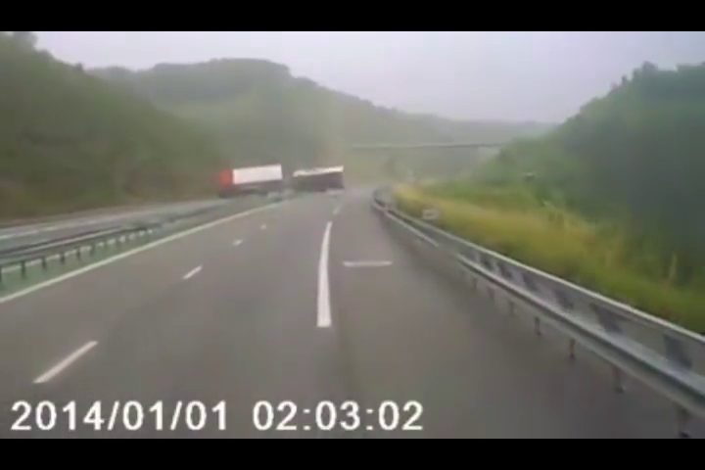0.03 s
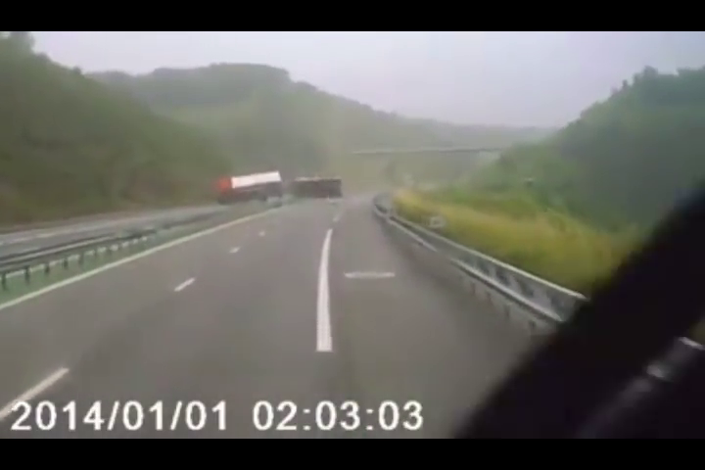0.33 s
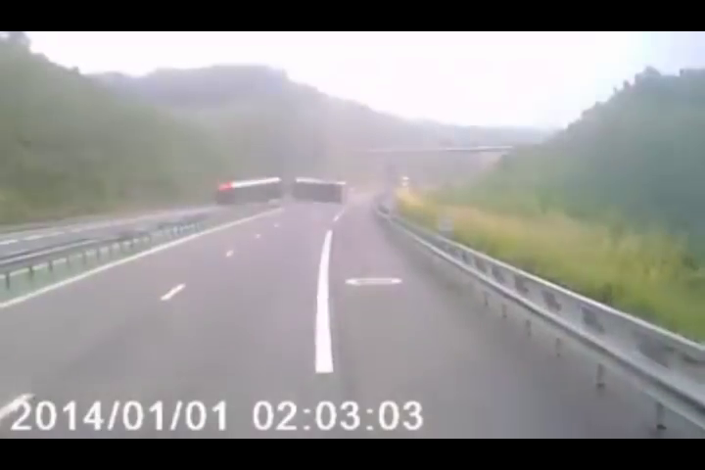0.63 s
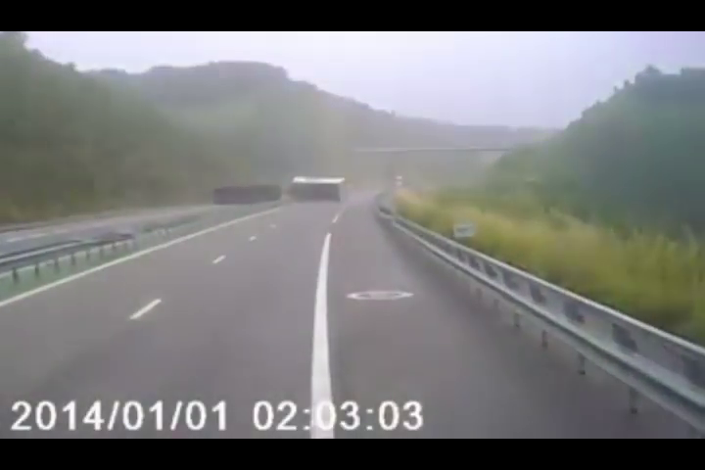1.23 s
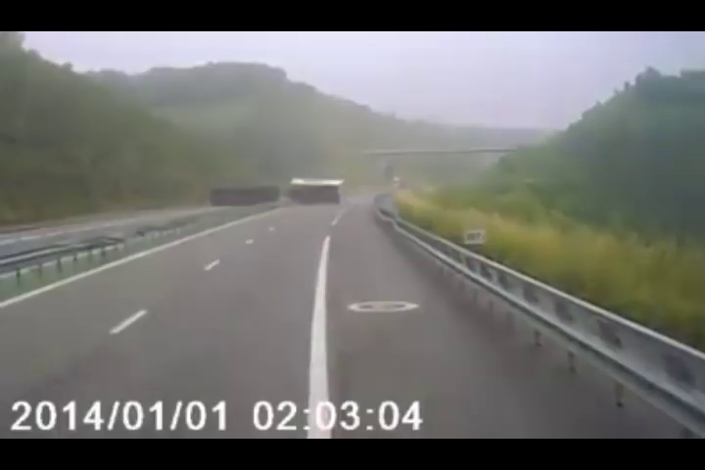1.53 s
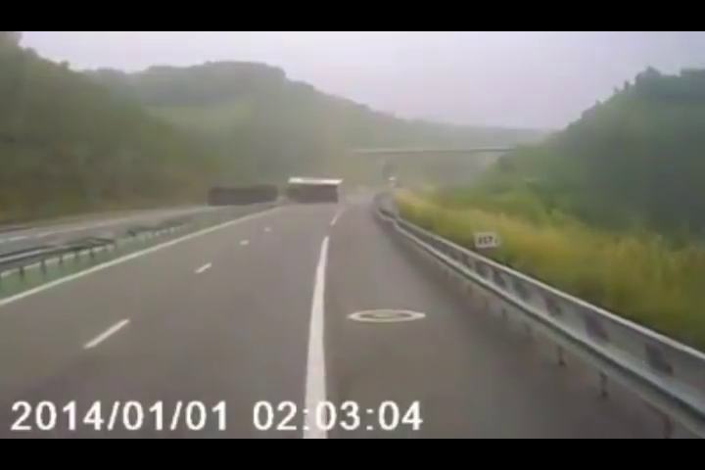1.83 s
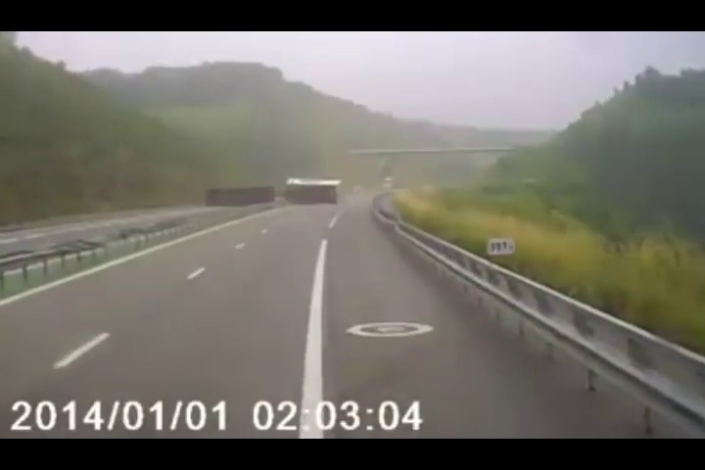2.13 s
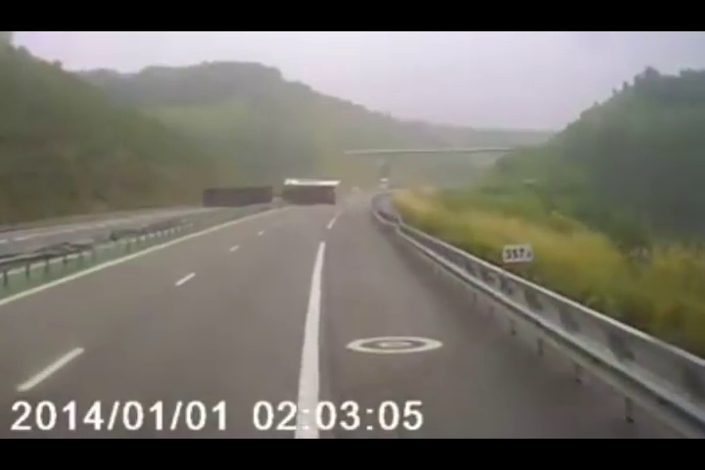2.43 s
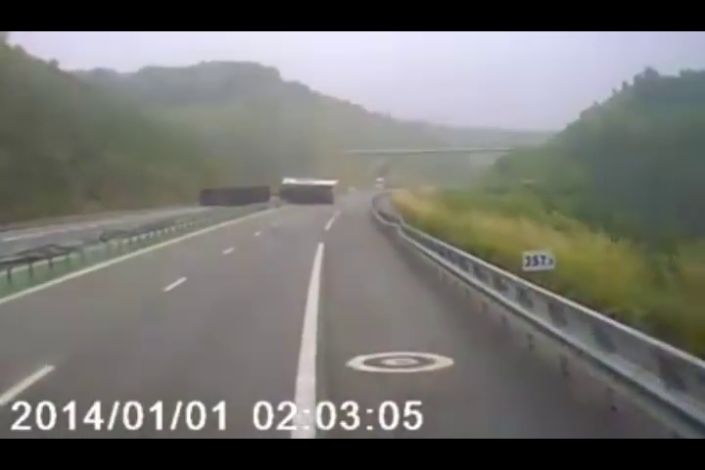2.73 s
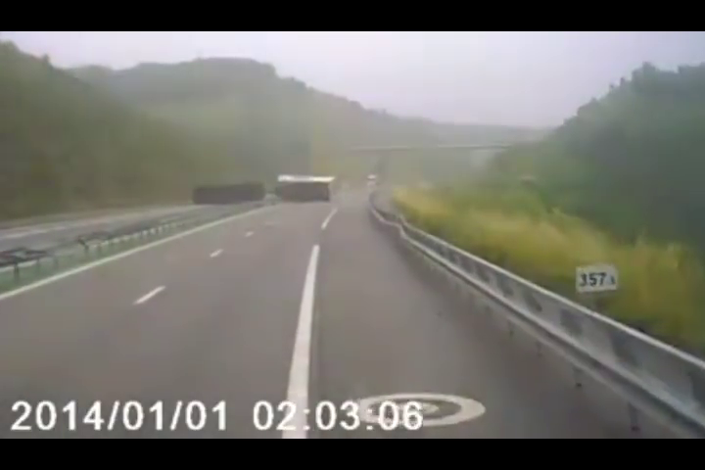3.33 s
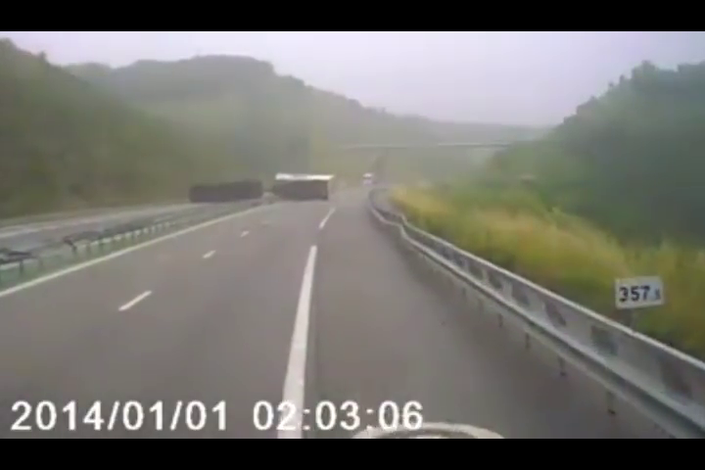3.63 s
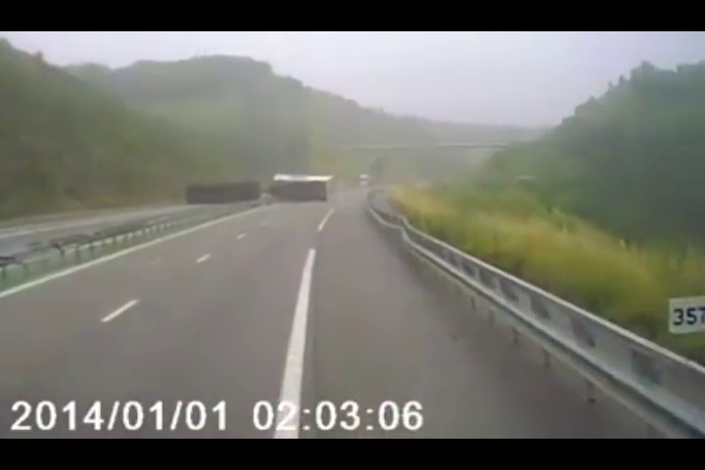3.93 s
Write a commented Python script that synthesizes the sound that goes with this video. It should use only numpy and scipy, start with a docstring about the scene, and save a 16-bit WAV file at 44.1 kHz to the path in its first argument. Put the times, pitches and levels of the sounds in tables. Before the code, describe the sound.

Road rumble and tyre roar fill the cabin of a vehicle on a highway. Two early bumps shake it, the first overloading the microphone. Loose trim knocks and rattles, and a turn indicator starts ticking about halfway through.

```python
"""Inside a vehicle on a highway. Tyre roar, body rumble and cabin drone swell on rough asphalt.
At once a bump shakes the cabin and overloads the microphone; a second follows at 1.2 s.
Loose trim knocks, bonks, snaps and squeaks along the way, and from 2 s it also rattles.
At 2.2 s the turn indicator starts ticking. A faint hum and microphone hiss last to the end."""
import sys
import numpy as np
from scipy import signal
from scipy.fft import rfft, irfft
from scipy.io import wavfile
from scipy.ndimage import uniform_filter1d

SR = 44100
rng = np.random.default_rng(int(sys.argv[2]) if len(sys.argv) > 2 else 0)


def log_audio(samples):
    """Write samples as a 16-bit WAV file to the path given in sys.argv[1]."""
    # one column per channel
    frames = np.atleast_2d(samples).T
    # limit to full scale, then quantise
    limited = np.clip(frames, -1, 1)
    pcm = np.round(limited * 32767).astype(np.int16)
    wavfile.write(sys.argv[1], SR, pcm)


N = 176400


def amp(db):
    """Amplitude ratio of a level."""
    return 10 ** (np.asarray(db) / 20)

def unit(x):
    """Normalisation to rms 1."""
    return x / np.sqrt(np.mean(x ** 2) + 1e-20)

def add(mix, onset, sound):
    """Superposition of a sound at onset/s."""
    part = mix[max(round(onset * SR), 0):][:len(sound)]
    part += sound[:len(part)]

def colour(x, spectrum):
    """Spectral shaping, to rms 1."""
    hz, db = np.transpose(spectrum)
    f = np.fft.rfftfreq(len(x), 1 / SR)
    gain = amp(np.interp(np.log(f + 1), np.log(hz), db))
    return unit(irfft(rfft(x) * gain, len(x)))

def drift(hz):
    """Low-pass random fluctuation, rms 1."""
    f = np.fft.rfftfreq(N, 1 / SR)
    return unit(irfft(rfft(rng.standard_normal(N)) * (f > 0) / (1 + (f / hz) ** 4), N))

def patchy_noise(depth_db=2):
    """Noise modulated at random in time and frequency."""
    z = signal.stft(rng.standard_normal(N), nperseg=1024, noverlap=768)[2]
    patches = uniform_filter1d(rng.standard_normal(z.shape), size=7, axis=0)
    patches = unit(uniform_filter1d(patches, size=10, axis=1))
    return signal.istft(z * amp(depth_db * patches), noverlap=768)[1][:N]

def ring(modes, rise):
    """Free vibration: damped modes build up over the contact time, rise/s."""
    t = np.arange(SR // 2) / SR
    partials = ((-1) ** k * amp(db - 60 * t / t60) * np.sin(2 * np.pi * hz * t)
                for k, (hz, db, t60) in enumerate(modes))
    return np.minimum(t / rise, 1) * sum(partials)

def burst(x, db, rise, hold, decay):
    """Transient envelope: linear rise/s, hold/s, exponential decay/(dB/s)."""
    t = np.arange(len(x)) / SR
    return x * np.minimum(t / rise, 1) * amp(db - decay * np.maximum(t - rise - hold, 0))

def contacts(per_second=2500):
    """Shot noise of chattering parts."""
    return rng.standard_normal(SR // 2) * (rng.random(SR // 2) < per_second / SR)

# Road excitation: t/s, rumble level/dB, drone level/dB, roar level/dB
SURFACE = [(0, -29, -31, -27), (.07, -20, -25, -23), (.24, -19.5, -25.5, -26.5), (.46, -24.5, -25.5, -26),
           (.6, -25.5, -30.5, -28.5), (.85, -26, -28.5, -26), (.97, -20, -24.5, -24),
           (1.12, -23.5, -23, -27.5), (1.42, -28, -29, -26), (1.529, -19.5, -20.5, -22),
           (1.78, -20, -19.5, -20.5), (1.859, -25.5, -24.5, -25), (2.0, -27, -27.5, -27.5),
           (2.551, -28, -36, -28.5), (3.049, -29, -35, -29), (3.4, -23.5, -31, -28.5),
           (3.52, -27.5, -49, -29.5), (4, -28, -37.5, -29.5)]
# Spectra of body rumble and tyre roar: f/Hz, relative level/dB
RUMBLE = [(10, -4), (30, 1.5), (48, -1.5), (64, -3.5), (85, -5), (125, -3.5), (190, -12.5), (270, -22),
          (500, -39), (1500, -73)]
ROAR = [(120, -34), (250, -2.5), (360, -0.5), (480, -2), (600, -3), (710, 0.5), (860, -3.5), (1030, -3),
        (1260, -1), (1500, -4.5), (1850, -11), (2250, -16), (2700, -24.5), (4000, -23), (7500, -47)]
# Cabin air resonances: f/Hz, bandwidth/Hz, relative level/dB
AIR_MODES = [(173.7, 13, 0.5), (205.9, 16, 2.5), (253.3, 31, -7), (314, 15, -8.5), (353.2, 22, -10),
             (391.2, 13.3, -7)]
def road():
    """Forced vibration: the rough surface drives body, cabin air and tyres."""
    times, *levels = np.transpose(SURFACE)
    rumble_gain, drone_gain, roar_gain = (amp(np.interp(np.arange(N) / SR, times, db)) for db in levels)
    f = np.fft.rfftfreq(N, 1 / SR)
    response = sum(amp(db) / (1 + (2 * (f - hz) / width) ** 2) for hz, width, db in AIR_MODES)
    rumble = colour(rng.standard_normal(N), RUMBLE)
    drone = unit(irfft(rfft(rng.standard_normal(N)) * response, N))
    roar = amp(drift(hz=25)) * colour(patchy_noise(), ROAR)  # flutters by 1 dB rms
    return rumble_gain * rumble + drone_gain * drone + roar_gain * roar

# Shudders: t/s, level/dB, rise/s, hold/s, decay/(dB/s)
BUMPS = [(0.094, -8, 0.0051, 0.019, 176), (1.179, -14.5, 0.0091, 0.054, 105.5)]
# Their spectrum: f/Hz, relative level/dB
SHUDDER = [(10, -12), (35, -6.5), (75, -3), (110, -6), (170, -8.5), (205, -3.5), (270, -12), (350, -11.5),
           (480, -17), (700, -12), (1000, -20.5), (1250, -13), (1700, -25), (2300, -28.5), (2800, -38.5),
           (7500, -43)]
# Wheel thumps and suspension jolts: t/s, level/dB
THUMPS = [(0.0893, -1), (0.1263, -8.5), (0.205, -11), (1.1772, -8), (1.211, -10), (1.2563, -8.5),
          (1.283, -16), (3.387, -26.5), (3.41, -21)]
JOLTS = [(.0995, -1.5), (1.228, -8), (1.279, -14), (1.331, -21)]
# Cabin and body modes: f/Hz, relative level/dB, T60/s
BOOM = [(70, -9, 0.16), (135, -7, 0.075), (171, 3, 0.1), (215.6, -2, 0.081)]
BODY = [(39.3, -0.5, 0.34), (76.4, -10, .25)]
def bumps():
    """Shock excitation: the body shudders, thumps make the cabin boom, jolts make the body heave."""
    out = np.zeros(N)
    for t, *envelope in BUMPS:
        add(out, t, burst(colour(rng.standard_normal(SR), SHUDDER), *envelope))
    for t, db in THUMPS:
        add(out, t, amp(db) * ring(BOOM, rise=0.00082))
    for t, db in JOLTS:
        add(out, t, amp(db) * ring(BODY, rise=0.004))
    return out

# Trim impacts: t/s, ring level/dB, tick level/dB, tilt about 1 kHz/(dB/octave)
KNOCKS = [(.3635, -4.5, -18, -4.5), (.414, -12, -27, -9.5), (.4235, -13, -36, -10), (1.1352, 0, -18.5, 1),
          (1.7875, -5, -22.5, -5), (2.2795, -17.5, -28, 2), (3.2025, -11.5, -31, -6.5),
          (3.8896, -9.5, -27, -7)]
# Trim modes: f/Hz, relative level/dB, T60/s
TRIM = [(357, -7, 0.011), (736, -9.5, 0.038), (920, -8, 0.034), (1406, 0, 0.016), (1745, -2.5, 0.014),
        (2360, -19, 0.016), (5370, -29.5, 0.021)]
# Contact tick spectrum: f/Hz, relative level/dB
CRACK = [(500, 4), (1800, 2.5), (2800, -2.5), (5000, -8), (7500, -27), (8000, -41)]
def knocks(rise=0.0017):
    """Impact excitation: loose trim ticks on contact and rings in its modes."""
    out = np.zeros(N)
    for t, ring_db, tick_db, tilt in KNOCKS:
        modes = [(hz, db + tilt * np.log2(hz / 1000), t60) for hz, db, t60 in TRIM]
        add(out, t, amp(ring_db) * ring(modes, rise))
        tick = colour(rng.standard_normal(SR // 2), CRACK)
        add(out, t, burst(tick, tick_db, rise, hold=rise, decay=4100))
    return out

# Panel impacts: t/s, level/dB, f/Hz, T60/s
BONKS = [(.002, -17.5, 437, 0.38), (2.6885, -9.5, 472, 0.067), (2.704, -12, 406, 0.038),
         (3.227, -19, 245, 0.1), (3.2608, -16, 387, 0.078)]
# Panel modes: frequency ratio, relative level/dB
PANEL = [(.66, -11), (1, -1), (1.5, -15)]
def bonks():
    """Plate vibration: inharmonic modes make the panels sound hollow."""
    out = np.zeros(N)
    for t, db, hz, t60 in BONKS:
        modes = [(hz * ratio, mode_db, t60) for ratio, mode_db in PANEL]
        add(out, t, amp(db) * ring(modes, rise=0.0038))
    return out

# Rattles: t/s, time scale/s, body level/dB, chatter level/dB
RATTLES = [(2.044, 0.021, -19.5, -43), (2.121, 0.018, -20.5, -42), (2.272, 0.0068, -15, -27),
           (2.386, 0.012, -28.5, -38), (3.203, 0.025, -27, -40)]
# Spectra of plastic body and bright chatter: f/Hz, relative level/dB
PLASTIC = [(100, -16.5), (350, 5), (800, -15.5), (1400, 1.5), (1900, -13), (2250, -9), (2800, -24),
           (7000, -24.5)]
CHATTER = [(1500, -21.5), (3300, -10.5), (4100, 0.5), (4700, -4.5), (5700, -14), (7400, -9.5),
           (8000, -41.5)]
def rattles():
    """Intermittent contact: dense collisions excite the resonances of loose plastic."""
    out = np.zeros(N)
    for t, span, body_db, chatter_db in RATTLES:
        clicks = contacts()
        sound = amp(body_db) * colour(clicks, PLASTIC) + amp(chatter_db) * colour(clicks, CHATTER)
        add(out, t, burst(sound, db=0, rise=span * 0.25, hold=span * 0.87, decay=780))
    return out

# Snaps: t/s, level/dB, hold/s
SNAPS = [(0.106, -23.5, 0.004), (3.5694, -14, 0.0052)]
# Their spectrum: f/Hz, relative level/dB
SNAP_SPECTRUM = [(600, -34), (1200, -4.5), (1620, 4), (1900, -6), (2230, -4), (2900, -8.5), (4300, -6.5),
                 (5200, -3), (6300, -5), (7400, 0.5), (8000, -30)]
def snaps():
    """Broadband transients: loose parts snap brightly."""
    out = np.zeros(N)
    for t, db, hold in SNAPS:
        noise = colour(rng.standard_normal(SR // 2), SNAP_SPECTRUM)
        add(out, t, burst(noise, db, rise=0.005, hold=hold, decay=1200))
    return out

# Flasher strokes: t/s, tick level/dB, tock level/dB
STROKES = [(2.206, -23, -55), (2.5747, -26, -17.5), (2.885, -22.5, -62), (3.2514, -23, -19),
           (3.588, -22, -70), (3.931, -25, -19)]
# Flasher modes: f/Hz, relative level/dB, T60/s
TICK = [(2424, 4, 0.047), (2560, -12, 0.021)]
TOCK = [(1376, 9, 0.027), (1746, 3.5, 0.037), (1240, 0, 0.058)]
# Contact buzz spectrum: f/Hz, relative level/dB
BUZZ = [(900, -14), (1400, 10), (2400, -5), (3000, -11), (4800, -8.5), (7500, -15.5), (8000, -53)]
def indicator(rise=0.0029, bounce_s=0.006):
    """Impact and rebound: the flasher ticks and tocks in turn; its contact buzzes and bounces once."""
    out = np.zeros(N)
    for t, tick_db, tock_db in STROKES:
        click = amp(tick_db) * ring(TICK, rise) + amp(tock_db) * ring(TOCK, rise)
        add(out, t, click)
        add(out, t + bounce_s * rng.uniform(0.716, 1.3), amp(-8) * click)
        buzz = colour(contacts(), BUZZ)
        add(out, t, burst(buzz, max(tick_db, tock_db) - 7, rise, hold=bounce_s, decay=1100))
    return out

# Squeaks: t/s, duration/s, level/dB
SQUEAKS = [(0.919, 0.038, -37), (3.208, 0.073, -44)]
def squeaks(pitch_hz=3900, jitter_hz=220):
    """Friction-induced oscillation: plastic rubs on plastic in an unsteady whistle."""
    out = np.zeros(N)
    for t, duration, db in SQUEAKS:
        hz = pitch_hz + jitter_hz * drift(hz=600)[:round(duration * SR)]
        whistle = np.sin(2 * np.pi * np.cumsum(hz) / SR)
        add(out, t, amp(db) * unit(np.hanning(len(hz)) * whistle))
    return out

# Engine and tyre tones: f/Hz, relative level/dB
HUM = [(59.2, -35.5), (705.2, -42.5), (990.5, -54), (1287, -44)]
def hum(wander_hz=2.38, gain_db=0.5):
    """Periodic excitation: engine and tyres give tones that waver in frequency."""
    out = np.zeros(N)
    for hz, db in HUM:
        phase = 2 * np.pi * np.cumsum(hz + wander_hz * drift(hz=10.9)) / SR
        out += amp(db + gain_db) * unit(np.sin(phase))
    return out

def scene():
    """Linear superposition of the sources in the cabin, in mono."""
    return (road() + hum() + bumps() + knocks() + bonks() + rattles() + snaps()
            + indicator() + squeaks())[None]

# Microphone hiss spectrum: f/Hz, relative level/dB
HISS = [(1000, -9.5), (3000, -8), (4200, -2.5), (5400, 1), (6200, -2.5), (6750, 4.5), (7500, 2.5),
        (8000, -53.5)]
def record(dry, hiss_db=-37.5, waver_db=1.5, cutoff_hz=7600):
    """Self-noise, saturation and band limiting: the microphone hisses, clips and loses high treble."""
    hiss = amp(hiss_db + waver_db * drift(hz=40)) * colour(patchy_noise(), HISS)
    lowpass = signal.firwin(801, cutoff_hz, window=("kaiser", 8), fs=SR)
    return signal.oaconvolve(np.clip(dry + hiss, -1, 1), lowpass[None], "same")

dry = scene()
out = record(dry)
log_audio(out)
```